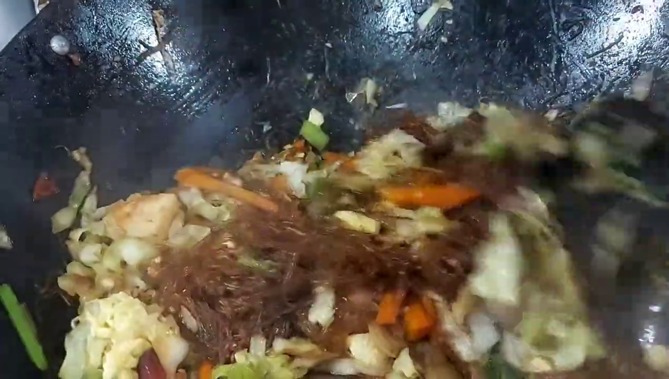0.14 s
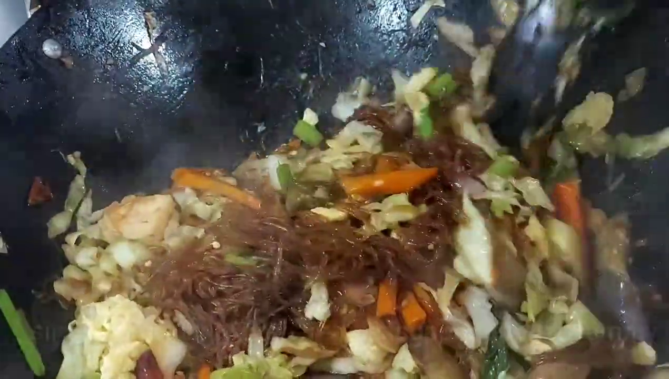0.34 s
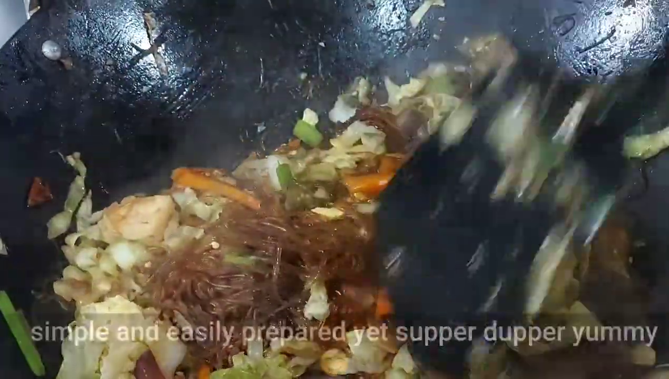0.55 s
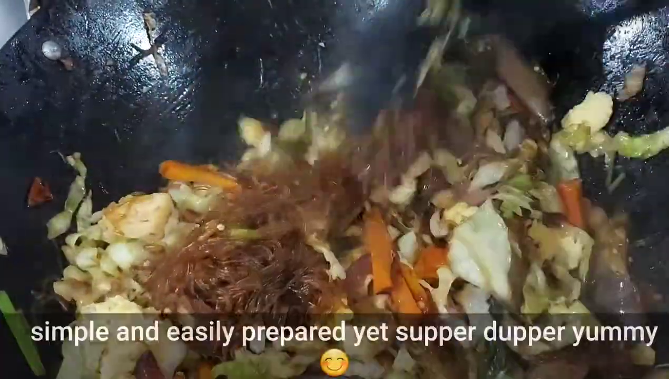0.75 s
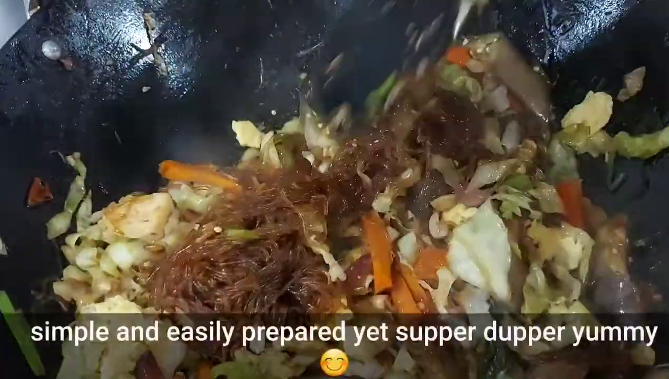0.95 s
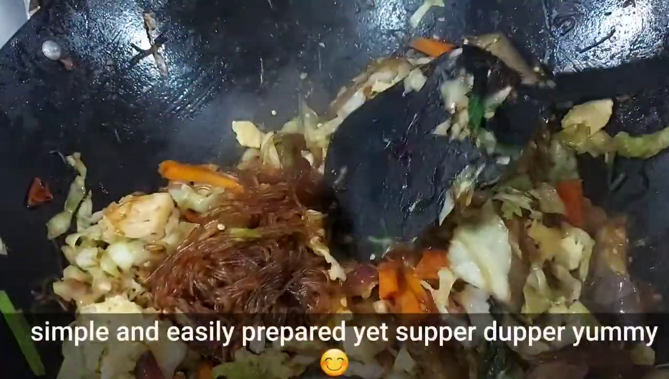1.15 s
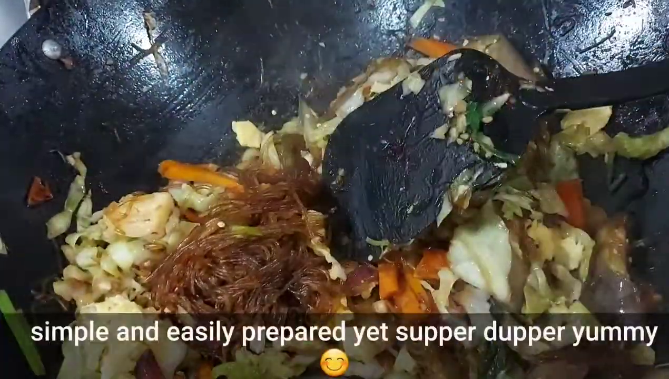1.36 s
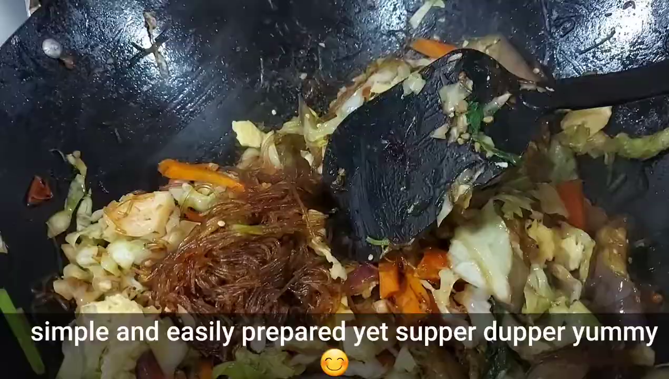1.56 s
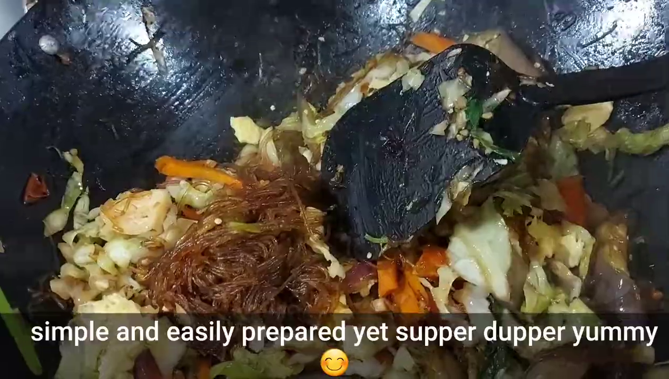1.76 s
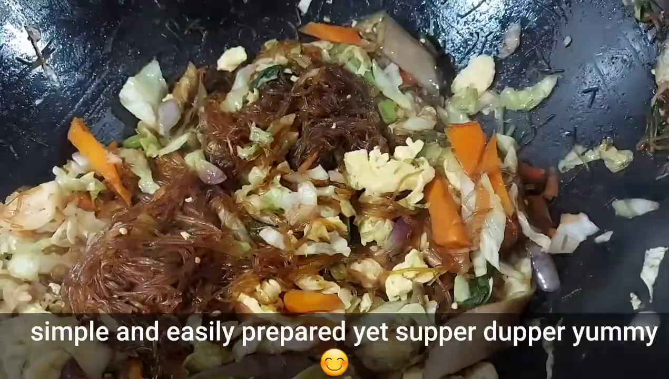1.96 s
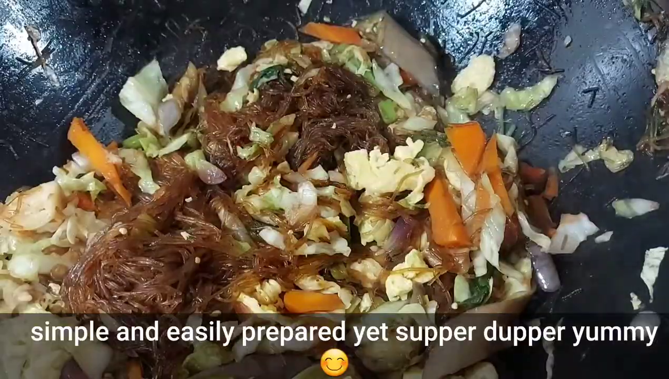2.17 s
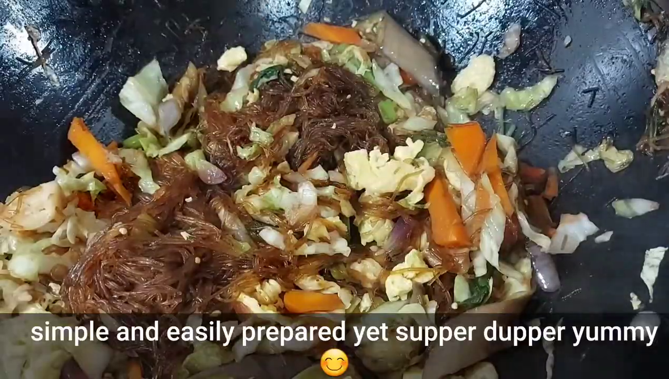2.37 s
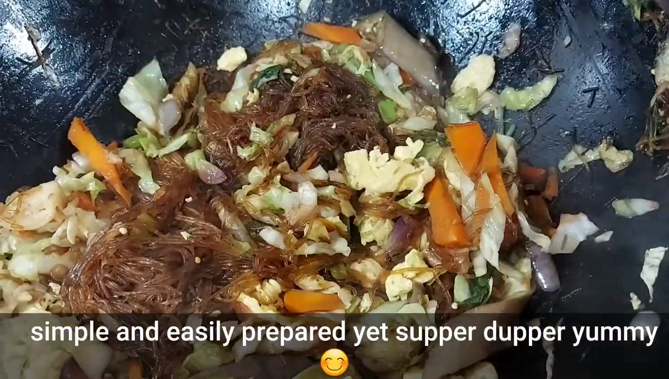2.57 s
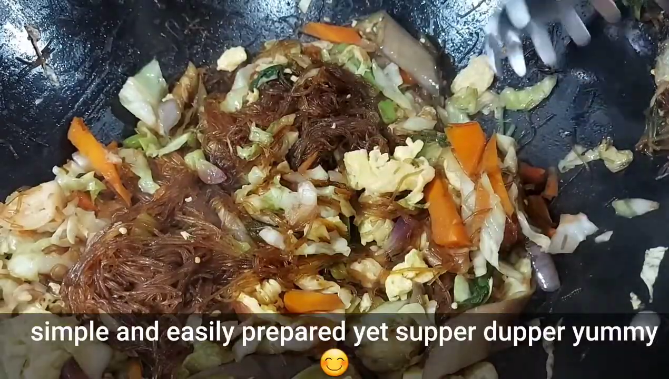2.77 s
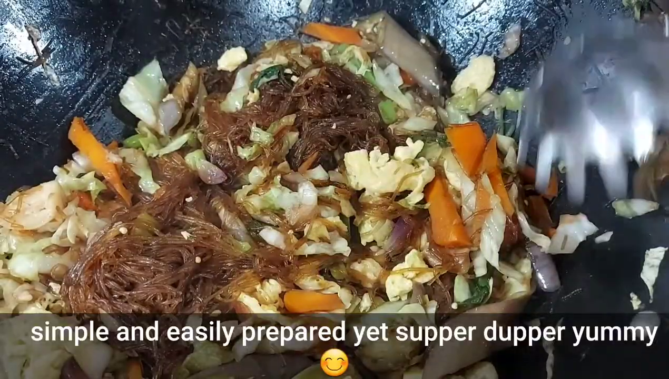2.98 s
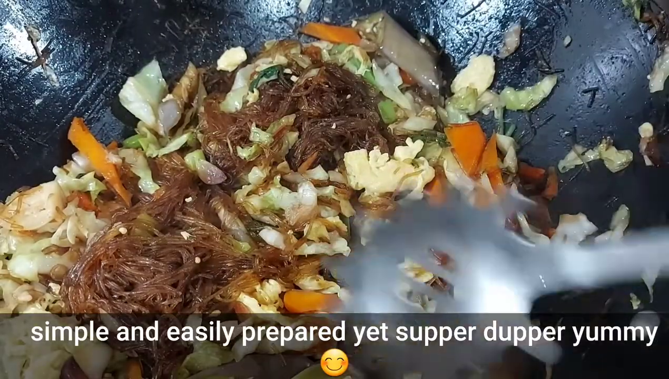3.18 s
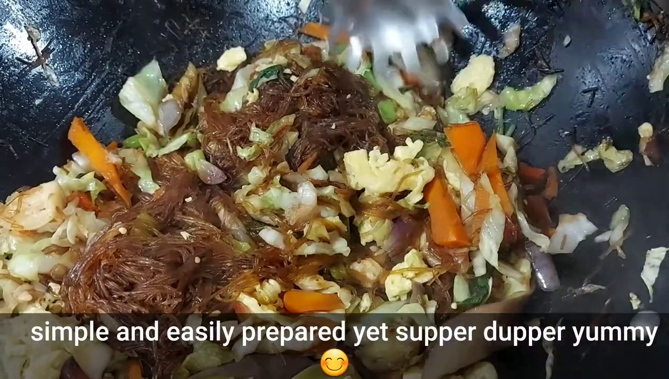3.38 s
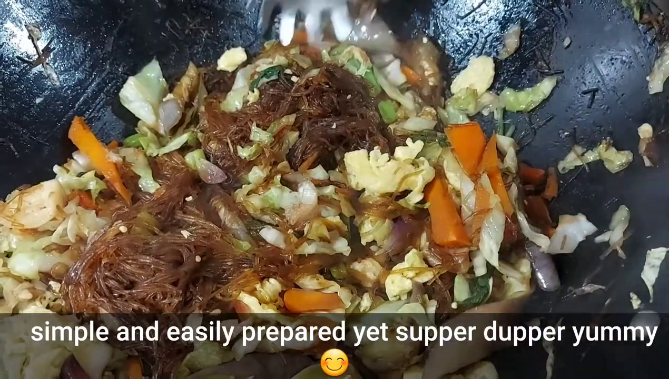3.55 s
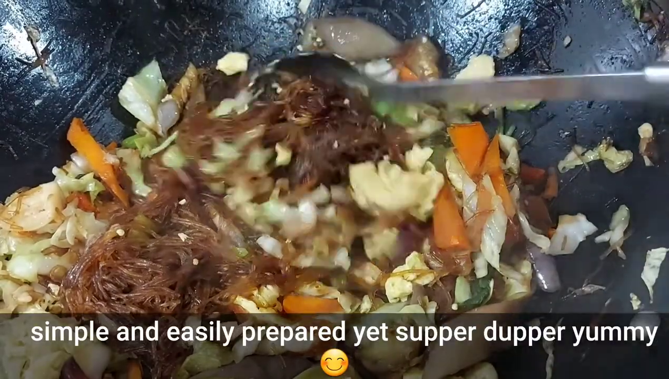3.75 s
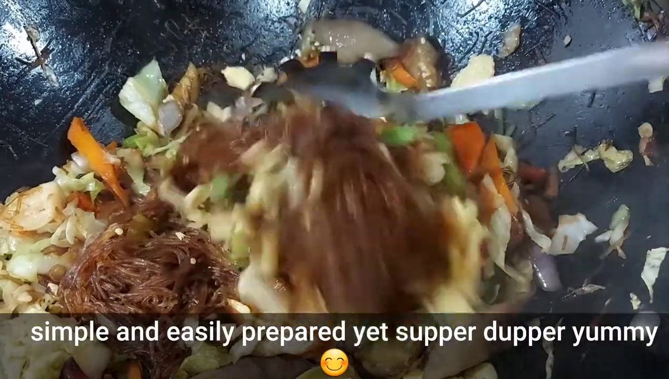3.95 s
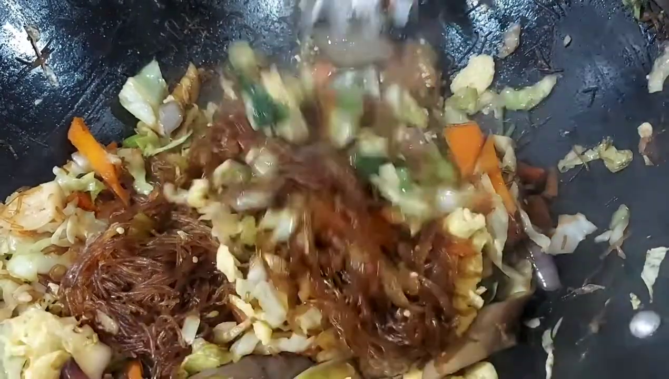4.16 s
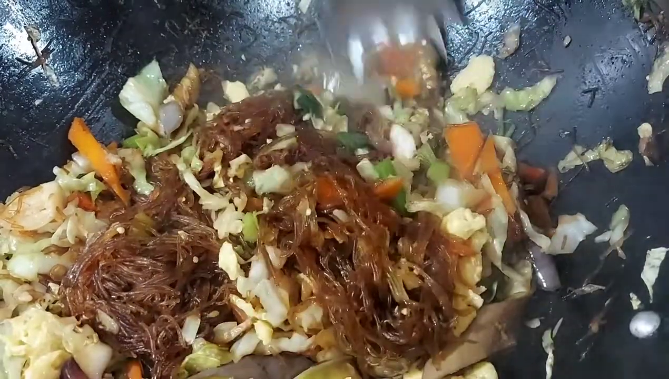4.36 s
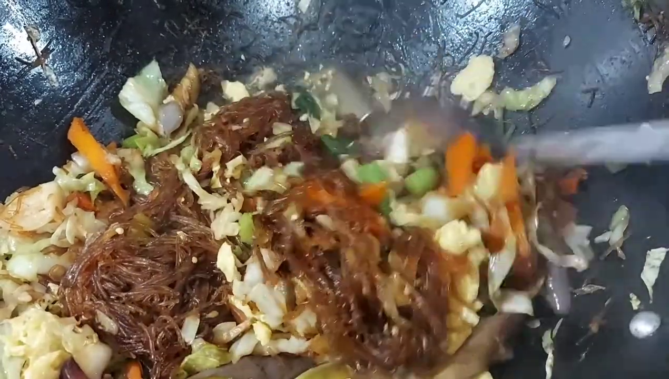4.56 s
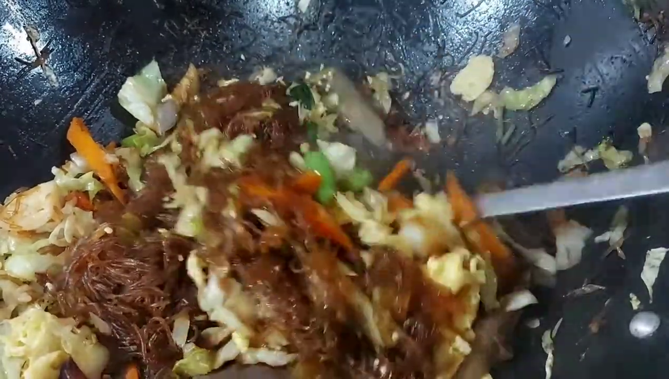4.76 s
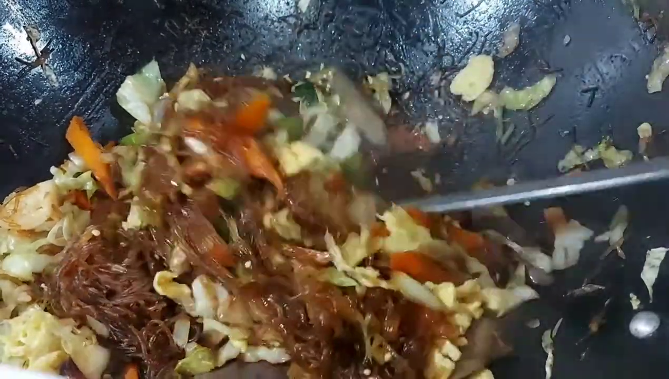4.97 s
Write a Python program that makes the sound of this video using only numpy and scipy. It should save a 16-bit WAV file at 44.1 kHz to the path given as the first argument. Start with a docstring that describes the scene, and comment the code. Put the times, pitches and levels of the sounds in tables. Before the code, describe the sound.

Noodles and vegetables fry fiercely as a spatula pushes them, then sound cuts to a soft burner murmur with a metal turner clanking, scraping and digging.

```python
"""A wok, a spatula and a steel turner

Vegetables and noodles sizzle close by: oil crackles, hisses and spits while a plastic spatula shoves the food.
After a brief silence the wok is cooler: shaped noise makes a burner's murmur and a faint fizz.
A steel slotted turner clanks on the pan, scrapes its wall, digs into the wet food and clanks again.
Blows and rubbing noise pass through the resonances of wok and blade; a short echo adds the kitchen."""
import sys
import numpy as np
from scipy import signal
from scipy.fft import rfft, irfft, next_fast_len
from scipy.io import wavfile
from scipy.ndimage import map_coordinates

SR = 44100
rng = np.random.default_rng(int(sys.argv[2]) if len(sys.argv) > 2 else 0)


def generate_wav(sig):
    """Save sig (samples, or channels by samples) to the path in sys.argv[1] as 16-bit PCM at SR."""
    pcm = np.round(np.clip(np.atleast_2d(sig).T, -1, 1) * 32767).astype(np.int16)
    wavfile.write(sys.argv[1], SR, pcm)


N = 221408

T = np.arange(N) / SR  # time in the scene (s)
TAU = np.arange(SR * 3 // 4) / SR  # time since a contact (s)
PAUSE_START_S, PAUSE_END_S = 1.817, 1.901  # the silence between the hot and the cooler wok
TOP_HZ = 15350  # almost nothing sounds above this
SIZZLE_DB = -36  # the resting sizzle at the start
SURGE_ATTACK_S = 0.035  # how fast steam or fresh fizz rises

# a utensil shoves the food against the pan; levels are before the mix in shoves():
# (start_s, length_s, blow_db, drag_db, hardness_db_per_octave, favoured_pitch_hz)
PUSHES = [(0.096, .003, -34, -39, 9, 596), (0.189, 0.01, -30.5, -48, 8.5, 750),
          (0.281, 0.019, -27.5, -42, -7, 257), (0.336, 0.022, -25, -31, 5, 249),
          (0.355, 0.018, -33.5, -45, 12.5, 303), (0.446, 0.018, -25.5, -41, -2.5, 257),
          (0.468, 0.028, -32.5, -35, -6, 240), (.563, 0.045, -38, -38.5, -3, 260),
          (0.665, 0.04, -33, -34.5, -2, 270), (0.728, 0.02, -34, -39, -3, 303),
          (.7018, .003, -34, -43, 21, 1100), (1.49, .003, -39.5, -48, 9.5, 800),
          (3.118, 0.023, -48, -38.5, 4, 440), (3.12, 0.02, -44, -43, 7, 1110),
          (3.201, 0.038, -43, -48.5, 3, 298), (3.694, 0.15, -44, -42, 6, 294),
          (3.773, 0.057, -31, -35.5, 0, 255), (3.789, 0.11, -39, -38.5, -6, 230),
          (3.829, 0.022, -29, -38.5, -2, 249), (3.845, 0.04, -32.5, -42, 4, 310),
          (3.891, 0.02, -38.5, -49, 1, 233), (4.45, 0.0025, -49, -31.5, 6.5, 426),
          (4.629, 0.042, -32, -37.5, 7, 480), (4.633, .012, -41.5, -57, 17, 1070),
          (4.702, 0.01, -35, -37.5, 5.5, 352), (4.727, 0.0048, -36.5, -37.5, 2.5, 298),
          (4.782, 0.012, -42, -41, -3, 290), (4.807, .01, -39.5, -39.5, 2.5, 293)]
# resonances of the loaded wok: (pitch_hz, width_hz, shoved_through_food_db, struck_by_steel_db)
WOK = [(233, 22, 0, -8), (305, 24, 1, -3), (432, 22, -12, 0), (555, 26, -10, 0), (690, 40, -18, -16),
       (835, 22, -16, -8), (1095, 50, -20, -24), (1400, 90, -27, -20), (1650, 80, -28, -15)]
# the wok rocking on its stand: (pitch_hz, width_hz, level_db)
STAND = [(76, 5.3, -6.5), (106, 2.8, -7)]
# resonances of the turner's blade, before any damping:
# (pitch_hz, width_hz, struck_db, edge_bites_db, edge_slides_db, bend_at_full_flex_percent)
BLADE = [(2490, 45, -14, -12, -16, 1), (2810, 45, -14, -17, -14, 1), (3080, 60, -13, -19, -14, .5),
         (3590, 75, -12, -13, -5, 0), (3735, 55, 1, -16, -2, -.6), (4180, 70, -4, -9, -4, 0),
         (4290, 60, 0, -15, -7, 0), (4430, 60, -1, -40, -17, 2), (4675, 30, 3, 0, -2, 2.5),
         (4800, 50, -7, -5, -13, 2.5), (5245, 50, -10, -3, -9, -.5), (5440, 60, -15, -5, -14, 0),
         (5700, 60, -15, -7, -6, 0), (5940, 50, -24, -3, -7, 0), (6180, 50, -20, -6, -13, 1),
         (6480, 50, -26, -6, -13, 0), (6775, 35, -23, 1, -10, 0), (7020, 50, -25, -9, -14, 0),
         (7500, 60, -18, -10, -6, .5), (7850, 90, -22, -8, -14, -1), (9080, 110, -24, -12, -10, 0),
         (11700, 110, -30, -9, -4, 0), (12150, 90, -30, -6, -5, 1), (12450, 70, -30, -3, -9, 0)]
# resonances of the turner's tip: (pitch_hz, width_hz, level_db)
TIP = [(12200, 3000, 17), (13200, 1200, -4), (14500, 900, 0)]
# colour of the blade's crowded upper resonances: (frequency_hz, level_db_per_hz)
SHEEN = [(4520, -50), (4750, -3), (5300, 0), (6300, -1), (6800, 0), (7500, -4), (9100, -5), (9900, -10),
         (11200, -9), (11900, -3), (12500, -2), (13200, -8), (14300, -8), (15500, -14)]


def hot_wok():
    """Bubbles burst ever more weakly until fresh food meets the metal and steams; a low roar follows the sizzle."""
    # colours of the sizzle and the roar: (frequency_hz, level_db_per_hz)
    oil_colour = [(120, -62), (200, -36), (315, 8), (345, -3.5), (377, 5), (406, 1), (583, 0.5), (794, 0.5),
                  (2730, 3), (3040, 3.5), (7820, -1), (10300, 3.5), (15300, -3.5)]
    roar_colour = [(15, -16), (25, -3.5), (40, -20), (54, 4.5), (118, 4), (161, -5.5), (240, 1), (310, -34),
                   (530, -120)]
    rest_hiss_db, steam_hiss_db = 3, 9  # smooth hiss over crackle
    roar_db, roar_follows = -52, 0.32  # level under the resting sizzle; dB per dB that the sizzle changes

    def boil(hiss_db):
        return unit(crackle(rate=3100, spread_db=10.5) + amp(hiss_db) * noise())

    rest, surge = boiling(T)
    bubbles = rest * boil(rest_hiss_db) + surge * boil(steam_hiss_db)
    flicker = amp(0.75 * wobble(56.75))
    sizzle = coloured(bubbles, oil_colour) * flicker
    vigour = np.hypot(rest, surge) / amp(SIZZLE_DB)
    roar = coloured(noise(), roar_colour) * amp(roar_db) * vigour ** roar_follows
    return sizzle + roar


def boiling(t):
    """Strength of the sizzle: its resting part sinks as the juice boils off; steam surges add to it."""
    # wet food lands on bare hot metal and flashes to steam: (start_s, length_s, level_db)
    steam_bursts = [(0.17, 0.071, -28.5), (0.254, 0.11, -31), (0.357, 0.52, -36.5), (1.145, 0.048, -38)]
    drying_db_per_s, surge_t60_s = 2, 0.43
    rest = amp(SIZZLE_DB - drying_db_per_s * t)
    power = sum((amp(db) * swell(t - s, length, SURGE_ATTACK_S, surge_t60_s)) ** 2
                for s, length, db in steam_bursts)
    return rest, np.sqrt(power)


def pops():
    """A bursting drop, a spatula tap or a tick cracks, rings for a few cycles, echoes off the wok's wall and
    throws a little spray."""
    # individually placed spits, spatula taps and faint ticks: (start_s, crack_db, ring_db, pitch_hz,
    # left_minus_right_db)
    placed_pops = [(.0985, -21, -26, 1390, -3), (0.2188, -31, -15, 7500, -12), (.2739, -24, -7, 12600, -9),
                   (.3106, -17, -29, 7300, -13), (.3916, -27, -13.5, 10600, 3), (0.4927, -16, -29, 5900, -7),
                   (0.5896, -26, -21.5, 9750, 15), (0.645, -14.5, -29, 4870, -8),
                   (0.7025, -5, -20.5, 4260, -4.5), (0.7474, -16.5, -33, 7000, -2),
                   (0.8857, -17, -31, 9150, -4), (.9307, -21, -31, 5500, 4), (.972, -10.5, -27, 4740, 2),
                   (0.9977, -16, -33, 8900, 3), (1.0231, -14, -20, 11900, 1), (1.0481, -8.5, -19.5, 4100, 2),
                   (1.1067, -15, -32, 3970, 1), (1.2, -28, -23, 9500, 0), (1.2097, -16, -22, 10000, 0),
                   (1.233, -21, -20, 10800, 2.5), (1.2456, -21, -21.5, 6000, -8),
                   (1.2911, -22, -32, 2380, -1), (1.3082, -20, -34, 3000, 3), (1.315, -23.5, -37.5, 1470, 11),
                   (1.3354, -21, -26, 9500, -2), (1.4322, -27, -35, 9460, -3), (1.467, -40, -22, 11300, 4),
                   (1.504, -39, -47, 3560, 2), (1.5459, -25.5, -44, 4420, 12), (1.581, -23, -45, 7050, 8),
                   (1.6496, -20, -23, 10900, -5), (1.689, -22, -35, 8000, -4),
                   (1.7969, -20.5, -35, 10000, -11), (2.749, -48, -41, 3900, 2), (4.805, -37, -38, 5500, 0),
                   (4.8457, -38, -40, 10000, 0)]
    crack_hz, crack_cycles, ring_cycles = 7850, 0.26, 0.88  # cycles until each peaks
    spray_db, spray_t60_s = -16, .011  # level against the crack
    out = np.zeros((2, N))
    t = np.arange(SR // 100) / SR

    def ping(hz, cycles):
        rise = t * hz / cycles
        return np.sin(2 * np.pi * hz * t) * rise * np.exp(1 - rise)

    def with_echo(snap):
        echo = .45 * np.roll(snap, rng.integers(14, 40))  # under a millisecond later, upside down
        return np.roll(snap - echo, rng.integers(3))

    for s, crack_db, ring_db, hz, pan_db in placed_pops + spatter():
        snap = amp(crack_db) * ping(crack_hz, crack_cycles) + amp(ring_db) * ping(hz, ring_cycles)
        heard = [with_echo(snap) for _ in range(2)]
        spray = amp(crack_db + spray_db - 60 * t / spray_t60_s) * rng.standard_normal((2, len(t)))
        add(out, s, amp([[pan_db / 2], [-pan_db / 2]]) * (heard + spray))
    return out


def spatter():
    """Small drops burst at random before the pause, following the sizzle's vigour; rows are like placed_pops."""
    per_s, crack_db, typical_hz = 140, -31, 7000  # crack level at the sizzle's starting strength
    spread_db, spread_octaves, spread_pan_db = 2, .7, 3.5  # scatter in strength, pitch and side
    ring_db = -2  # against the crack
    drops = rng.standard_normal((round(per_s * PAUSE_START_S), 3))
    times = rng.uniform(0, PAUSE_START_S, len(drops))
    vigour_db = 20 * np.log10(np.hypot(*boiling(times))) - SIZZLE_DB
    levels = crack_db + vigour_db + spread_db * drops[:, 0]
    pitches = np.minimum(typical_hz * 2 ** (spread_octaves * drops[:, 1]), TOP_HZ)
    return list(zip(times, levels, levels + ring_db, pitches, spread_pan_db * drops[:, 2]))


def shoves():
    """A shove thumps the wok, drags on it and squeezes wet food; more food makes it duller and wetter."""
    # colour of squeezed wet food: (frequency_hz, level_db_per_hz)
    wet_colour = [(150, 5.5), (400, 11), (900, 4), (1500, -2), (2800, -3), (4500, -15), (7500, -22.5),
                  (11000, -18.5), (15000, -29)]
    push_attack_s, push_t60_s = .003, 0.15
    crunch_db, crunch_t60_s = 9, 0.099  # the blow also crushes food: level against the blow
    wet_db, wet_per_hardness = -8.5, 0.63  # rustle against drag; dB less per step of hardness
    favour_db, favour_octaves = 10, 0.39  # the spot that is hit brings out modes around one pitch
    out, n = np.zeros((2, N)), len(TAU)
    for s, length, blow_db, drag_db, hard_db, spot_hz in PUSHES:
        drag = amp(drag_db) * swell(TAU, length, push_attack_s, push_t60_s)
        force = blow(blow_db) + drag * noise(n)
        crush = drag + amp(blow_db + crunch_db) * fade(crunch_t60_s)
        rustle = 0.12 * noise(n) + 0.48 * crackle(rate=1100, spread_db=2.0, size=n)
        squeeze = amp(wet_db - wet_per_hardness * hard_db) * crush * rustle
        modes = []
        for hz, width, db, _ in WOK:
            closeness = np.exp(-(np.log2(hz / spot_hz) / favour_octaves) ** 2)
            modes.append((hz, width, db + favour_db * closeness))
        pan = ring(force, modes, tilt_db=hard_db, sign=-0.92)
        stand = amp(-11.0) * ring(force, STAND, sign=-3.0)
        add(out, s, amp(-7.0) * (pan + stand) + coloured(squeeze, wet_colour))
    return out


def clanks():
    """Steel meets steel: the blade sings, the wok thuds and rings, the edge chatters and the stand rocks."""
    # the turner strikes the pan; levels are before the mix below: (start_s, knock_db, blade_db,
    # singing_db, sheen_db, tip_db, chatter_db, rocking_db, rocking_delay_s)
    strikes = [(2.859, -26, -29, -60, -22.5, -20, -38, -38.5, 0.065),
               (2.934, -33.5, -56, -70, -46, -50, -58, -44, .02),
               (4.3532, -27, -26, -31.5, -66, -47, -44, -40.5, 0.081),
               (4.362, -41.5, -43, -53, -58, -54, -44.5, -52.5, 0.034)]
    # the blade's strongest modes, which ring on: (pitch_hz, level_db, t60_s)
    singing_modes = [(3715, -4, .17), (4258, -5, .1), (4430, 1, .06), (4710, 3, .05)]
    # colours of the knock and the rumble: (frequency_hz, level_db_per_hz)
    knock_colour = [(40, -40), (150, -16), (310, 2), (450, -3.5), (600, -5), (900, -20), (1600, -13),
                    (2400, -57)]
    rumble_colour = [(20, -6), (40, -15), (65, 10), (100, -8), (160, -6), (260, -34)]
    contact_widens, thud_widens = 3.5, 15  # damping widens blade modes on contact, wok modes under the blow
    crack_t60_s, chatter_t60_s = 0.048, .55  # steel on steel; the chattering edge
    rock_s, rock_tail_db, rock_t60_s = 0.052, -17, 2.6  # a swell and ebb, then a faint wobble
    rumble_db = -5.5  # the stand rumbles while the wok rocks
    out, n = np.zeros((2, N)), len(TAU)
    pressed = [(hz, contact_widens * width, db) for hz, width, db, *_ in BLADE]
    free = [(hz, width, db) for hz, width, _, db in WOK]
    damped = [(hz, thud_widens * width, db) for hz, width, db in free]
    for s, knock_db, blade_db, sing_db, sheen_db, tip_db, chatter_db, rock_db, delay_s in strikes:
        crack = 0.74 * fade(crack_t60_s) * noise(n)
        chatter = amp(chatter_db) * fade(chatter_t60_s) * crackle(rate=700, spread_db=5, size=n)
        blade = ring(amp(blade_db) * (blow(-25.5) + 1.22 * crack) + chatter, pressed)
        tip = ring(amp(tip_db) * crack + 0.14 * chatter, TIP)
        sheen = coloured(amp(sheen_db) * crack + 0.083 * chatter, SHEEN)
        sing = np.zeros((2, n))
        for hz, db, t60 in singing_modes:
            phase = 2 * np.pi * hz * TAU + rng.uniform(0, np.pi, (2, 1))
            sing += amp(sing_db + db) * fade(t60) * np.sin(phase)
        shudder = fade(0.81) * noise(n)
        thud = ring(blow(-9), damped, sign=-0.47)
        ringing = ring(blow(-10) + amp(-18.5) * shudder, free, sign=-0.99)
        pan = thud + ringing + amp(-14) * coloured(shudder, knock_colour)
        rocking = np.exp(-((TAU - delay_s) / rock_s) ** 2)
        tones = unit(sum(amp(db) * np.sin(2 * np.pi * hz * TAU) for hz, _, db in STAND))
        stand = tones * (rocking + amp(rock_tail_db) * swell(TAU, delay_s, delay_s, rock_t60_s))
        rumble = amp(rumble_db) * rocking * coloured(noise(n), rumble_colour)
        add(out, s, blade + tip + sheen + sing + amp(knock_db) * pan + amp(rock_db) * (stand + rumble))
    return out


def scrape():
    """The edge sticks and slips thousands of times a second, rasping and ringing the flexing blade and its tip."""
    # the edge grazes the wall, slides, bites and slips off:
    # (start_s, length_s, rasp_db, blade_squeal_db, tip_db)
    strokes = [(2.904, .06, -44, -41, -44), (2.953, 0.18, -36, -35, -45), (2.956, 0.055, -30, -30, -39),
               (2.975, 0.021, -40, -29.5, -42), (3.134, 0.017, -54, -33.5, -40),
               (4.37, 0.075, -73, -52, -51), (4.4, 0.029, -70, -62, -59), (4.445, 0.026, -66, -47, -67)]
    attack_s, t60_s = 0.0051, 0.052
    power = sum((amp(levels_db)[:, None] * swell(T - s, length, attack_s, t60_s)) ** 2
                for s, length, *levels_db in strokes)
    rasp, squeal, tip = np.sqrt(power)
    slips = 0.7 * noise() + 0.7 * crackle(rate=3000, spread_db=3)
    return coloured(slips * rasp, SHEEN) + ring(slips * tip, TIP) + squeal * squealing()


def squealing():
    """Blade modes speak in spurts, many high ones favoured by a biting edge; they bend as the blade flexes."""
    # how the edge meets the wall: (time_s, bite_0_to_1, blade_flex_0_to_1)
    edge_path = [(2.91, 0.3, 0), (2.96, 0.74, 0.01), (3, 0.9, 0), (3.04, 0, 0.46), (3.08, 0.07, 1),
                 (3.14, 0, 0.97)]
    judder_db, judder_per_s = 3, 22  # depth and rate of the spurts
    waver_percent = .5  # each mode's pitch is slightly unsteady
    times, bites, flexes = np.transpose(edge_path)
    bite = np.clip(np.interp(T, times, bites), 0, 1)
    flex = np.interp(T, times, flexes)
    out, power = np.zeros((2, N)), np.zeros(N)
    for hz, width, _, bite_db, slide_db, bend in BLADE:
        gain = amp(slide_db + bite * (bite_db - slide_db) + judder_db * wobble(judder_per_s))
        bend_percent = bend * flex + waver_percent * wobble(judder_per_s)
        phase = 2 * np.pi * np.cumsum(hz * (1 + bend_percent / 100)) / SR
        # slow random curves turn the tone into a noise band reaching width to either side
        knots = rng.standard_normal((2, 2, round(2 * width * T[-1])))
        a, b = signal.resample(knots, next_fast_len(N), axis=-1)[..., :N]
        out += gain * unit(a * np.cos(phase) + b * np.sin(phase))
        power += gain ** 2
    return out / np.sqrt(power)


def smacks():
    """Sticky noodles part in a short swell of wet clicks."""
    # noodles pull free, loudest at peak_s: (peak_s, level_db, pitch_hz, fall_to_37_percent_s)
    wet_smacks = [(4.545, -34.5, 2000, .0065)]
    out = np.zeros((2, N))
    for s, db, hz, length in wet_smacks:
        clicks = amp(db) * np.exp(-np.abs(T - s) / length) * crackle(rate=3200, spread_db=9.5)
        out += ring(ports(clicks), [(.8 * hz, 700, 0), (1.3 * hz, 950, -1)], sign=-1)
    return out


def cool_wok():
    """The burner murmurs and the food barely fizzes, a little more after each shove."""
    # colours of the burner and the fizz: (frequency_hz, level_db_per_hz)
    burner_colour = [(15, -55), (25, -28), (36, -4), (54, -13), (132, -3), (206, -5), (249, 0), (287, 0.5),
                     (350, -1), (437, 2.5), (527, -5), (905, -9), (1140, -8.5), (1350, -11), (2100, -7),
                     (6800, -28), (8840, -61), (15000, -120)]
    fizz_colour = [(2000, -16), (4000, 6), (6000, 1), (8000, 1), (10500, 4), (12500, 2.5), (15000, -3)]
    burner_db, fizz_gain_db = -53, -60  # around which the burner wavers; the fizz at rest
    refizz_db, refizz_t60_s = -22, 1.5  # fresh fizz against a shove's drag; how it settles
    burner = coloured(noise(), burner_colour) * amp(burner_db + 1.96 * wobble(4.65))
    fizz = coloured(noise() + 0.5 * crackle(rate=1800, spread_db=9.5), fizz_colour)
    stirred = sum((amp(drag_db + refizz_db) * swell(T - s, length, SURGE_ATTACK_S, refizz_t60_s)) ** 2
                  for s, length, _, drag_db, *_ in PUSHES)
    return burner + fizz * np.sqrt(amp(fizz_gain_db) ** 2 + stirred)


def kitchen(x):
    """Hard walls answer with a tail of fading noise; the treble dies first."""
    # how long the echo takes to fall by 60 dB: (frequency_hz, t60_s)
    echo_times = [(100, 0.64), (400, 0.38), (4000, 0.25), (14000, 0.16)]
    hz, t, z = signal.stft(rng.standard_normal((2, SR // 2)), SR, nperseg=256)
    dying = amp(-60 * t / along(echo_times, hz)[:, None])
    tail = signal.istft(z * dying, SR, nperseg=256)[1]
    tail = np.pad(tail / np.linalg.norm(tail[0]), ((0, 0), (SR // 200, 0)))  # starts 5 ms late
    return ports(signal.fftconvolve(x, tail, axes=1)[:, :N])


def amp(db):
    """Turn decibels into a gain."""
    return 10 ** (np.asarray(db) / 20)


def unit(x):
    """Scale x to an rms (average strength) of 1."""
    return x / np.sqrt(np.mean(np.abs(x) ** 2) + 1e-20)


def along(points, hz):
    """Read a curve of (frequency, value) points on a logarithmic frequency axis."""
    f, v = np.transpose(points)
    return np.interp(np.log(hz + 1), np.log(f + 1), v)


def wobble(rate):
    """A smooth random curve through rate random points a second."""
    return map_coordinates(rng.standard_normal(int(N * rate / SR) + 4), [T * rate])


def filtered(x, response):
    """Change x by a gain that depends on frequency."""
    n = x.shape[-1]
    m = next_fast_len(n + SR // 2)
    return irfft(rfft(x, m) * response(np.fft.rfftfreq(m, 1 / SR)), m)[..., :n]


def coloured(x, spectrum):
    """Give x a tone colour with a power gain of 1."""
    return filtered(x, lambda hz: unit(amp(along(spectrum, hz))))


def ring(x, modes, tilt_db=0, sign=1):
    """Pass x through resonances with a power gain of 1, tilted per octave; like signs leave notches between."""
    def response(f):
        total = 0
        for k, (centre, width, db) in enumerate(modes):
            gain = sign ** k * amp(db + tilt_db * np.log2(centre))
            total = total + gain * 1j * f * width / (centre * centre - f * f + 1j * f * width)
        return unit(total)

    return filtered(x, response)


def ports(pair):
    """Blend two unrelated signals into left and right: bass alike, treble almost unrelated."""
    # likeness of left and right: (frequency_hz, likeness_0_to_1)
    likeness = [(60, 1), (130, 0.86), (290, 0.97), (640, 0.4), (1410, 0.23), (3100, 0.033), (6820, 0.0043),
                (15000, 0.017)]

    def shares(hz):
        turn = np.arccos(np.clip(along(likeness, hz), -1, 1)) / 2
        return np.array([np.cos(turn), np.sin(turn)])

    mid, side = filtered(pair, shares)
    return np.array([mid + side, mid - side])


def noise(size=N):
    """White noise on the left and right."""
    return ports(rng.standard_normal((2, size)))


def crackle(rate, spread_db, size=N):
    """Tiny clicks of random strength, rate a second; each reaches left and right at slightly different times."""
    strength = amp(spread_db * np.minimum(rng.standard_normal(size), 2.5)) * rng.choice([-1, 1], size)
    strength = strength * (rng.random(size) < rate / SR)
    lag = rng.uniform(-9, 9, size)  # samples

    def arrive(shift):
        return np.clip(np.rint(np.arange(size) + shift), 0, size - 1).astype(int)

    return unit(np.array([np.bincount(arrive(side * lag), strength, size) for side in (-1, 1)]))


def blow(db):
    """A single click with the energy of 20 ms at this level."""
    return (TAU == 0) * amp(db) * np.sqrt(SR / 50)


def fade(t60):
    """A loudness curve that falls by 60 dB in t60 seconds after a contact."""
    return amp(-60 * TAU / t60)


def swell(t, length, attack, t60):
    """A loudness curve that rises from t = 0, holds until length, then dies away."""
    return np.clip(t / attack, 0, 1) * amp(-60 * np.maximum(t - length, 0) / t60)


def add(out, s, x):
    """Mix x into out from time s (seconds)."""
    part = out[:, round(s * SR):][:, :x.shape[-1]]
    part += x[..., :part.shape[1]]


def scene():
    """The hot wok, then the cooler one, with the utensils working in both."""
    hot = T < (PAUSE_START_S + PAUSE_END_S) / 2
    near = shoves() + clanks() + scrape() + smacks() + pops()
    wok = np.where(hot, hot_wok(), cool_wok())
    balance = amp([[.4], [-.4]])  # the left is slightly louder
    return (wok + near + amp(-8) * kitchen(near)) * balance


def record(dry):
    """Remove the deepest bass, fall silent during the pause, and cut the treble sharply at the band limit."""
    gate_times = [PAUSE_START_S, PAUSE_START_S + .005, PAUSE_END_S - .003, PAUSE_END_S]
    gate = np.interp(T, gate_times, [1, 0, 0, 1])
    thin = filtered(dry, lambda hz: hz ** 3 / np.sqrt(hz ** 6 + 36 ** 6))
    return filtered(thin * gate, lambda hz: 1 / np.sqrt(1 + (hz / TOP_HZ) ** 200))


dry = scene()
out = record(dry)
generate_wav(out)
```